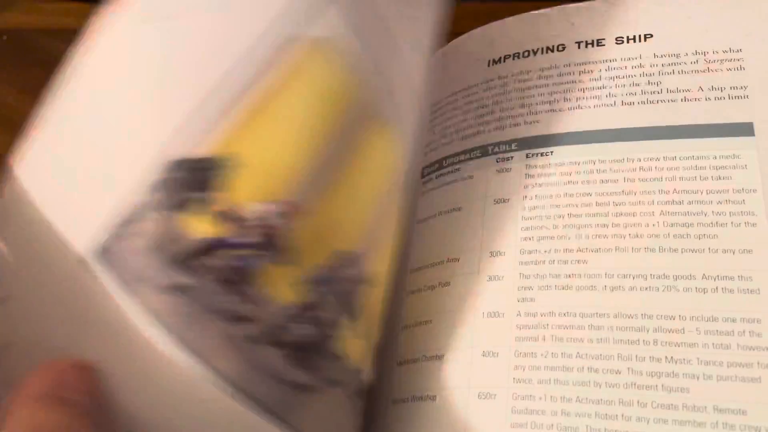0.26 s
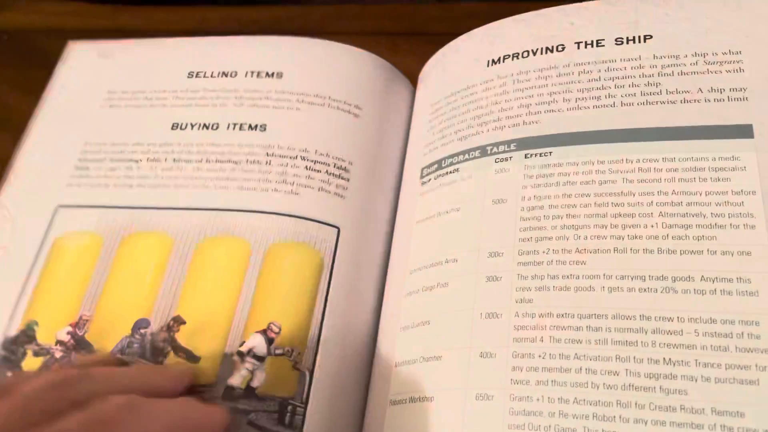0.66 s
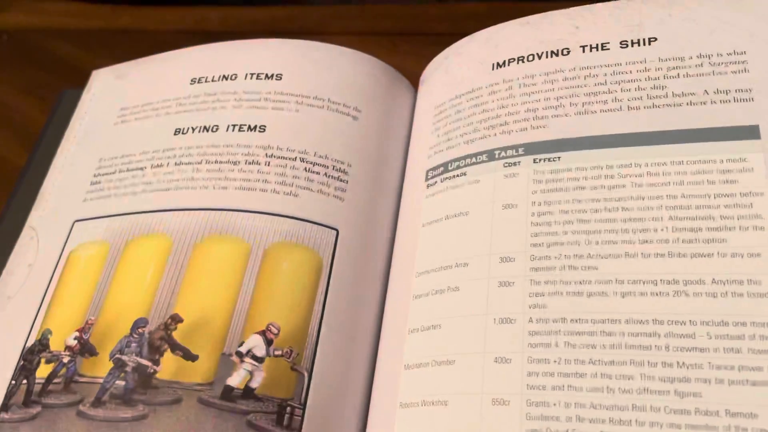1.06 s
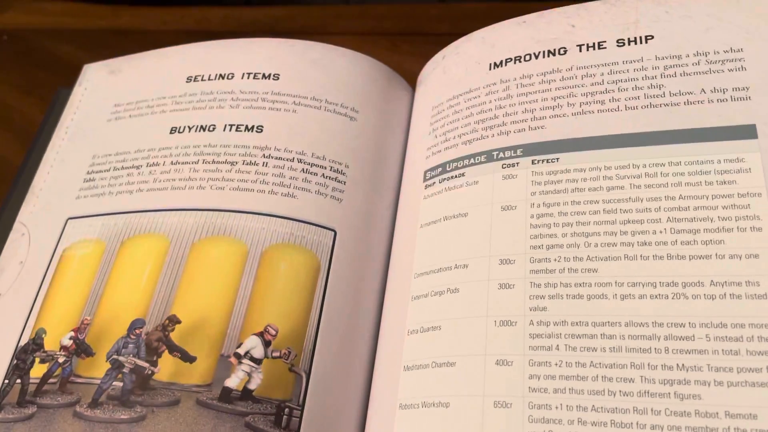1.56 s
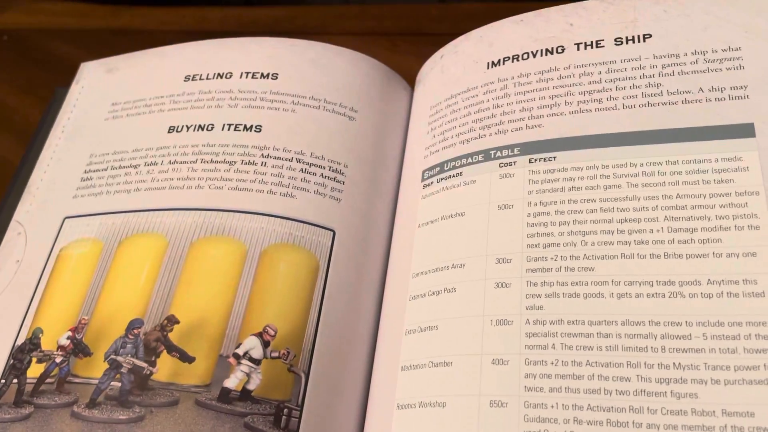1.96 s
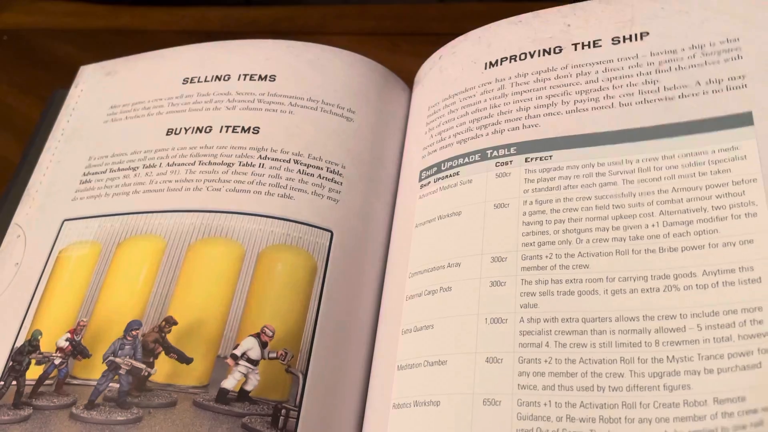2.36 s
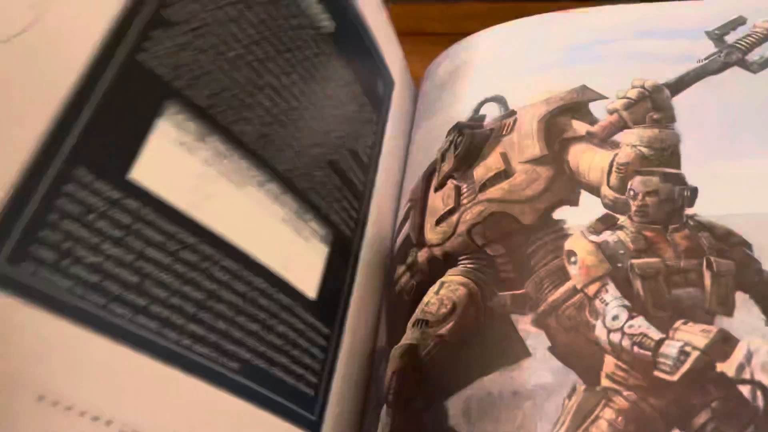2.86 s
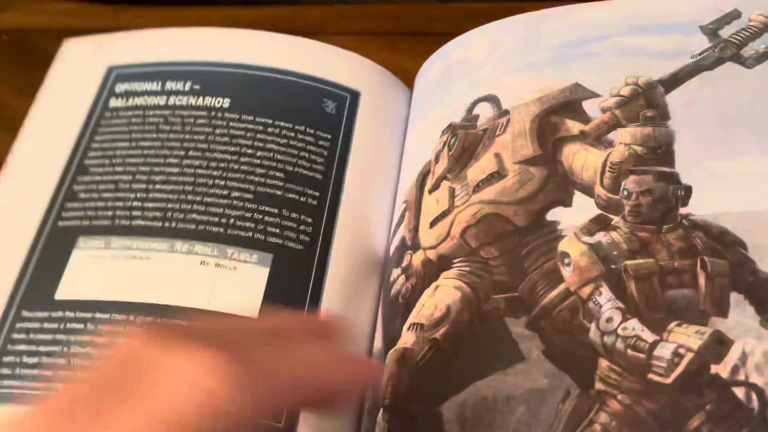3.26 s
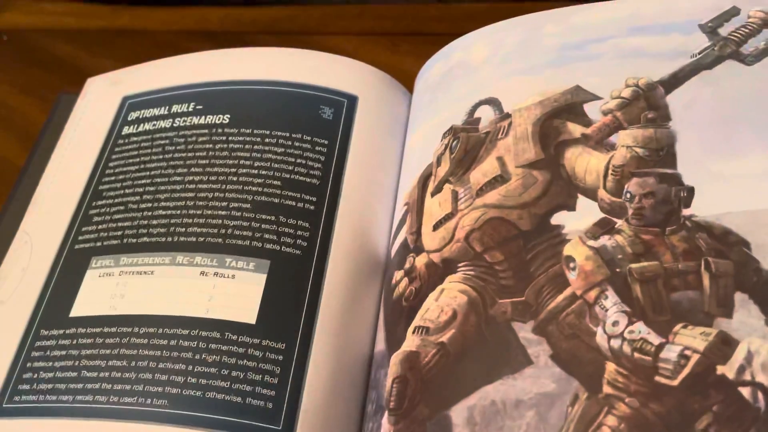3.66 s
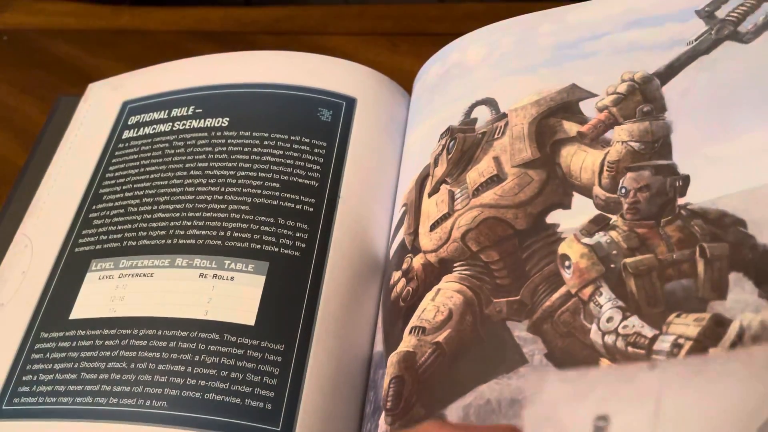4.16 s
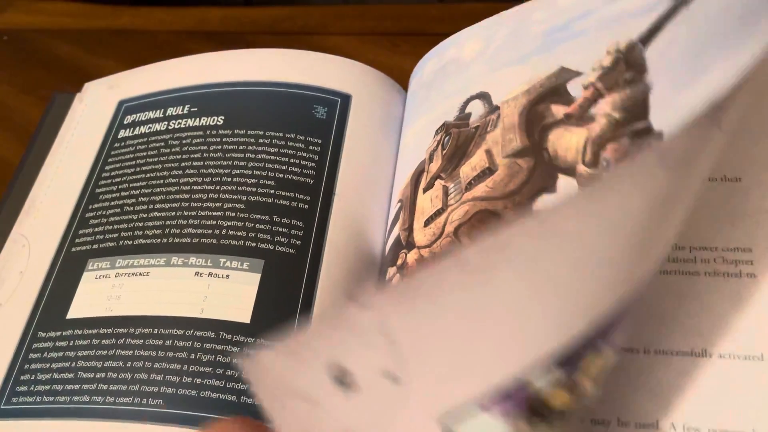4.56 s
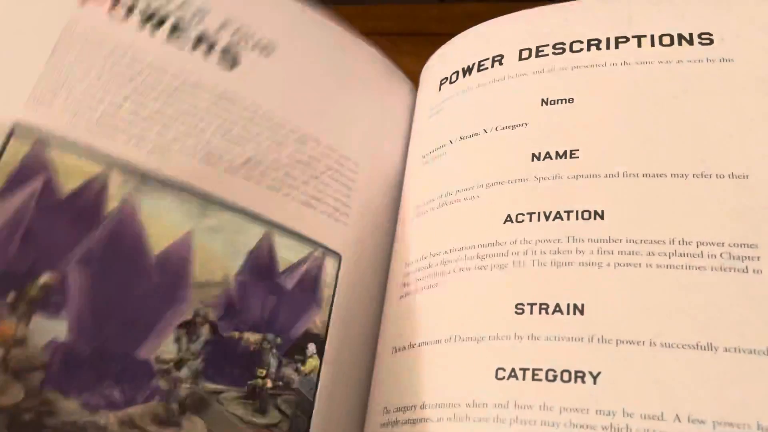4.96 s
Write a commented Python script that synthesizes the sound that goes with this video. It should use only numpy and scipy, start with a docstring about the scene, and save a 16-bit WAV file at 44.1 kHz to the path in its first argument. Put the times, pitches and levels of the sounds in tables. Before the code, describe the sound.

Glossy pages of a thick book are handled on a wooden table, close to a stereo microphone in a quiet, dry room. A soft slide of paper starts at 0 s, with a small click at 0.14 and a dull, swelling flap at about 0.3. A crisp edge snap comes at 0.6, then light crackly rubbing fades, leaving near quiet around 1.0-1.5. From 1.55 to 2.4 page edges tick off the thumb in bright snaps, strongest at 2.0-2.15, with low thuds falling in pitch through the table. Rubbing grows from 2.4 until a sheet flaps over with a thump at 2.87. Only faint rustle remains from 3.1 to 3.75. Clicks resume at 3.8, then sharp slides and snaps gather at 4.1-4.3, the loudest at 4.26. Another lift and turn follows, with swishes, a snap at 4.72 and dull flaps with a thud around 4.85-4.95. Faint low rumble and still air lie beneath.

```python
"""A soft slide of paper on paper comes first, then the glossy pages of a thick book are thumbed, lifted and turned
on a wooden table, close to a two-port microphone. Sliding paper is shaped noise with small crackles, page edges
snap off the thumb as clicks with short rattles, and sheets belly and flap down as swells of duller noise.
Each snap also sends a thud, falling in pitch, through book and table; behind it all lie a short room tail,
the low rumble of a quiet room and still air."""
import sys
import numpy as np
from scipy import signal
from scipy.fft import rfft, irfft, next_fast_len
from scipy.io import wavfile
from scipy.ndimage import uniform_filter1d

SR = 44100
rng = np.random.default_rng(int(sys.argv[2]) if len(sys.argv) > 2 else 0)


def master_out(mix):
    """Clip the mix to full scale and print it as 16-bit PCM to the path in sys.argv[1]."""
    frames = np.transpose(np.atleast_2d(mix))
    ceiling = np.clip(frames, -1, 1)
    pcm = np.round(ceiling * 32767).astype(np.int16)
    wavfile.write(sys.argv[1], SR, pcm)


N = 230466

# Paper or finger sliding on paper: start t/s, length t/s, hiss level/dB at start, hiss level/dB at end,
# belly level/dB over the hiss, fizz level/dB over the hiss
SLIDES = [(0.0, 0.096, -56.5, -60.5, -7, -6.5), (0.106, 0.026, -60.5, -50, 2.5, -6),
          (0.233, 0.17, -68.5, -71.5, -15, 0.5), (0.607, 0.15, -61.5, -60, -32, 4.5),
          (0.807, 0.32, -61.5, -77.5, -1.5, 2.5), (1.216, 0.24, -95, -77, -3, 0.5),
          (1.552, 0.28, -54, -89, -5.5, -9), (1.708, 0.095, -57.5, -63.5, -4.5, -6.5),
          (1.837, 0.16, -62, -84, -3, -10), (1.99, 0.16, -54, -73, 5.5, -25.5),
          (2.144, 0.17, -50.5, -85, -6.5, -24.5), (2.312, 0.068, -65, -60, 0.5, -16),
          (2.396, 0.28, -56.5, -58, -20, -6), (2.574, 0.075, -65, -53.5, -25, -1),
          (2.643, 0.24, -49.5, -52.5, -24, -7.5), (3.405, 0.13, -77, -82.5, -24, -2.5),
          (3.644, 0.22, -81.5, -66.5, -3, 2.5), (3.86, 0.048, -62, -52, -5.5, -20),
          (3.914, 0.14, -61, -59.5, -3, -9.5), (4.067, 0.011, -54, -52, -9.5, -13.5),
          (4.139, 0.033, -39.5, -46.5, -5.5, -15.5), (4.206, 0.0076, -36, -36, -10, -27),
          (4.09, 0.041, -67, -61.5, -0.5, -19), (4.289, 0.084, -41.5, -54, -10, -10),
          (4.379, 0.092, -53, -50, -36, -11), (4.531, 0.25, -55.5, -61, -8.5, -3.5),
          (4.711, 0.1, -44, -46, -6.5, -8.5), (4.821, 0.063, -45.5, -58, 4, -2),
          (4.903, 0.0039, -43.5, -42.5, 4.5, -11)]
# A sheet bellies out and drops: peak t/s, belly level/dB, swell rate/(dB/s), fall rate/(dB/s)
FLAPS = [(0.296, -49.5, 502, 231), (0.325, -36.5, 298, 323), (0.612, -54.5, 3000, 145),
         (0.884, -55.5, 500, 400), (2.86, -49.5, 103, 898), (2.879, -36.5, 2498.5, 357),
         (3.464, -68, 273, 159), (4.464, -47.5, 252, 503), (4.537, -51, 904, 213), (4.845, -43.5, 152, 168),
         (4.937, -43, 245, 600), (5.024, -65, 798, 502)]
# Page edges slipping free: t/s, nominal snap level/dB, body level/dB over the snap, thud peak level/dB
SNAPS = [(0.135, -42.5, 14, -57), (0.6069, -32, -4, -51), (0.636, -68, 7, -49), (1.282, -48.5, 2, -86),
         (1.5618, -22.5, -30, -54), (1.5781, -27, -33, -51), (1.8436, -30.5, -37, -50.5),
         (1.9958, -21, -9.5, -39.5), (2.0303, -19.5, -9.5, -38), (2.1052, -19, -3, -30.5),
         (2.15, -16, -2.5, -33.5), (2.3152, -27, -2, -46), (2.393, -33.5, -4, -49.5),
         (2.6727, -35, -19, -43), (2.8737, -22.5, 7, -28), (2.888, -45, 31.5, -51.5), (2.9, -51, 36.5, -50),
         (2.9054, -33.5, 12, -41.5), (3.8037, -27, -6.5, -62), (3.8686, -23, -27, -50.5),
         (3.8781, -32.5, 3.5, -51.5), (4.1427, -22.5, -2, -69), (4.2127, -21, -1, -55),
         (4.258, -12.5, -5, -51), (4.2854, -17.5, -2.5, -56.5), (4.4392, -41, 1, -49.5),
         (4.456, -56, 10, -66), (4.482, -36.5, -1, -64), (4.535, -49.5, 13.5, -49), (4.562, -43.5, 1, -51),
         (4.7222, -24.5, -4, -47), (4.795, -39, -9, -40), (4.84, -35, 14.5, -37.5),
         (4.908, -37, 16.5, -29.5), (4.93, -43.5, 25.5, -41.5), (4.952, -50.5, 27, -58),
         (5.016, -67.5, 34, -59)]
# Dry creases in the paper: t/s, nominal level/dB
TICKS = [(0.986, -47.5), (1.3408, -56.5), (1.5084, -42), (1.527, -40), (1.886, -47.5), (1.935, -53),
         (1.972, -48), (2.003, -29), (2.3347, -38.5), (2.558, -42.5), (3.1014, -61), (3.6597, -52.5),
         (3.6866, -61), (3.771, -59), (3.8013, -30), (3.832, -38.5), (3.886, -35.5), (4.124, -47),
         (4.4254, -35), (4.8073, -32.5), (4.92, -41)]
# Spectrum of paper rubbing: f/Hz, level/dB
HISS_SPECTRUM = [(350, -29.5), (800, -3), (1500, 5), (2400, 4.5), (3250, 5), (4200, 2.5), (5500, 3),
                 (6800, -1.5), (8500, -23)]
# Spectrum of the high fizz of sliding: f/Hz, level/dB
FIZZ_SPECTRUM = [(4300, -25.5), (5500, 3), (8000, 0.5), (12000, 4), (14500, 5.5), (16300, -38)]
# Spectrum of the duller rush and slap of a sheet: f/Hz, level/dB
BELLY_SPECTRUM = [(200, -5.5), (480, 2), (650, 5), (750, 7), (1050, 1.5), (1600, -5.5), (2500, -43)]
# Spectrum of snapping edges and creases: f/Hz, level/dB
SNAP_SPECTRUM = [(300, -7), (1000, -12), (2000, 0.5), (3500, -2), (6000, -7), (16500, -23.5)]
# Bending wave in the table: cycles per e-fold of time, start t/s, rise t/s, T60 t/s
TABLE_WAVE = (1.737, 0.0037, 0.012, 0.093)
# Resonance of the free part of the sheet, moving as it is bent and held: t/s, f/Hz, strength level/dB
SHEET_RESONANCE = [(.105, 1900, 1), (.14, 1830, 8), (.3, 2760, 6), (0.619, 5150, -8), (.72, 5400, -2),
                   (.98, 3130, 0), (1.57, 4940, 1.5), (1.8, 5650, 6), (2.1, 2920, -12.5), (2.44, 5360, 0.5),
                   (2.532, 5780, 1.5), (2.6, 4550, -3.5), (2.74, 3340, -6), (3.949, 2800, -6),
                   (4.221, 1970, -12.5), (4.601, 5780, -12.5), (4.76, 5830, -4.5), (4.918, 1700, -2.5)]
# Decay of the room: f/Hz, T60 t/s
ROOM_T60 = [(300, 0.2), (12000, 0.096)]
# Weight shifting on the table: t/s, rumble level/dB
RUMBLE_LEVEL = [(0, -61.5), (1.298, -66), (2.701, -60.5), (3.1, -64), (4.1, -63.5), (4.3, -46.5),
                (4.6, -64), (4.849, -49), (5.051, -64)]
# Spectrum of the rumble: f/Hz, level/dB
RUMBLE_SPECTRUM = [(25, -13), (62, 6.5), (100, -8), (160, -12.5), (300, -21), (500, -64.5)]
# Spectrum of the still air: f/Hz, level/dB
AIR_SPECTRUM = [(200, 11.5), (700, 1.5), (1500, -6.5), (5000, -14.5), (16000, -30.5)]
# Likeness of the left and right channels: f/Hz, likeness/1
CHANNEL_LIKENESS = [(60, .95), (1400, .8), (5000, .84), (7600, .98)]
# Level difference of the channels: f/Hz, left over right level/dB
CHANNEL_TILT = [(60, 1.2), (500, 4.2), (4000, 3.6), (7600, 0)]
# Phase by which the left channel leads, before the opposite-phase bands: f/Hz, lead/rad
CHANNEL_LEAD = [(60, .55), (300, 1.1), (600, .5), (2500, 1.0), (5000, .6), (7400, 0), (14000, .25)]
# Edges of the treble bands where left and right are in opposite phase: f/Hz
OPPOSITE_PHASE_EDGES = [7490, 9135, 13240]

GRIP_DB_PER_S, LIFT_DB_PER_S = 4496, 1504  # how fast a slide sets in and lets go
REST_DB = -94  # constant faint floor under the slides and flaps
FLAP_HISS_DB, FLAP_FIZZ_DB = -17, -53.5  # over the belly
CRACKLE_PER_S, CRACKLE_DB = 350, -12.5  # small creases under a slide, level over the hiss
CRACKLE_SPREAD_DB, TICK_T60_S = 4, 0.01
ROOM_DB, AIR_DB = -11.0, -76.5
BASS_CUT_HZ, EDGE_HZ = 42, 16600


def strokes():
    """Sliding paper hisses and fizzes; the bellying sheet adds a duller, lumpier rush."""
    hiss_level, fizz_level, belly_level = stroke_levels()
    contact = flutter(width=60, depth_db=1.5)
    hiss = evened(colour(pair(patchy_db=2.0), HISS_SPECTRUM))
    fizz = evened(colour(pair(patchy_db=1.5), FIZZ_SPECTRUM))
    lumpy = pair(patchy_db=3.0) * flutter(width=25, depth_db=3.5)
    rush = evened(colour(lumpy, BELLY_SPECTRUM)) * flutter(width=150, depth_db=0.5)
    sliding = contact * (hiss_level * hiss + fizz_level * fizz)
    return sliding + belly_level * rush + crackle(hiss_level)


def stroke_levels():
    """Slides and flaps add in power, giving the moving levels of hiss, fizz and belly."""
    power = np.full((3, N), gain_of(REST_DB) ** 2)
    for start, length, start_db, end_db, belly_db, fizz_db in SLIDES:
        slide = tent(start, start + length, start_db, end_db, GRIP_DB_PER_S, LIFT_DB_PER_S)
        power += (gain_of([[0], [fizz_db], [belly_db]]) * slide) ** 2
    for peak, db, swell, fall in FLAPS:
        flap = tent(peak, peak, db, db, swell, fall)
        power += (gain_of([[FLAP_HISS_DB], [FLAP_FIZZ_DB], [0]]) * flap) ** 2
    return np.sqrt(power)


def crackle(hiss_level):
    """Creases pop: a few large ones stand alone, a random swarm of small ones rides on every slide."""
    size = gain_of(CRACKLE_SPREAD_DB * np.minimum(rng.exponential(1, N), 4))
    pops_now = rng.random(N) < CRACKLE_PER_S / SR
    swarm = evened(size * pops_now) * gain_of(CRACKLE_DB) * hiss_level
    swarm = swarm * rng.choice([-1., 1.], N)
    ticks = np.zeros(N)
    for s, db in TICKS:
        ticks[round(s * SR)] = gain_of(db)
    decay = gain_of(-60 * np.arange(SR // 20) / SR / TICK_T60_S)
    burst = signal.oaconvolve(ticks, decay)[:N] * pair(patchy_db=0)
    return colour(burst + swarm, SNAP_SPECTRUM)


def snaps():
    """Each slip is a tick, a short uneven rattle of the edge, and a knock into the table."""
    bright, dull, knock, tick, slap = np.zeros((5, N + SR))
    t = np.arange(SR // 4) / SR
    rattle = 0.35 * (1 - np.exp(-t / 0.00093)) * gain_of(-60 * t / 0.024)
    slow_rattle = uniform_filter1d(rattle, size=100)  # the body moves slower
    for s, db, body_db, thud_db in SNAPS:
        at = round(s * SR)
        snap_gain, body_gain = gain_of(db), gain_of(db + body_db)
        bright[at:at + len(t)] += snap_gain * rattle
        dull[at:at + len(t)] += body_gain * slow_rattle
        tick[at + 50] += 1.17 * snap_gain  # the edge lets go at once
        slap[at + 50] -= 1.83 * body_gain
        knock[at + 40] += gain_of(thud_db)
    grain = pair(patchy_db=0) * flutter(width=40, depth_db=1.5)
    edge = colour(bright[:N] * grain + tick[:N], SNAP_SPECTRUM)
    body = colour(dull[:N] * pair(patchy_db=2) + slap[:N], BELLY_SPECTRUM)
    return edge + body + signal.oaconvolve(knock, thud())[:N]


def thud():
    """A bending wave through the table, of peak 1: the high part arrives first, so the thud falls in pitch."""
    cycles, start, rise, t60 = TABLE_WAVE
    t = np.arange(SR // 4) / SR
    envelope = (1 - np.exp(-t / rise)) * gain_of(-60 * t / t60)
    wave = envelope * np.sin(2 * np.pi * cycles * np.log(1 + t / start))
    return wave / abs(wave).max()


def sheet(x, width_hz):
    """The free part of the sheet rings: its moving resonance is shifted to zero, smoothed twice, shifted back."""
    s, hz, db = np.transpose(SHEET_RESONANCE)
    t = np.arange(N) / SR
    turn = np.exp(2j * np.pi * np.cumsum(np.interp(t, s, hz)) / SR)
    r = np.exp(-np.pi * width_hz / SR)
    smooth = signal.lfilter([(1 - r) ** 2], [1, -2 * r, r ** 2], x / turn + 1e-18)
    ring = 2 * (turn * smooth).real
    return gain_of(np.interp(t, s, db)) * ring


def room(x):
    """Sparse taps of random sign, each band dying at its own speed, its left-right likeness set by frequency."""
    taps = np.zeros((2, SR // 2))
    slots = np.arange(200, SR // 2 - 20, 20)  # one tap in every 20 samples
    at = slots + rng.integers(0, 20, (2, len(slots)))
    np.put_along_axis(taps, at, rng.choice([-1., 1.], at.shape), 1)
    hz, t, z = signal.stft(taps, SR, nperseg=256)
    same = np.clip(read(CHANNEL_LIKENESS, hz), 0, 1)[:, None] ** 4
    z[1] = same * z[0] + np.sqrt(1 - same ** 2) * z[1]
    decay = gain_of(-60 * t / read(ROOM_T60, hz)[:, None])
    tail = signal.istft(z * decay, SR, nperseg=256)[1]
    tail = tail / np.linalg.norm(tail[0])
    return signal.fftconvolve(x.mean(0)[None], tail, axes=1)[:, :N]


def rumble():
    """Lumpy low vibration of table and building, as shaped noise."""
    s, db = np.transpose(RUMBLE_LEVEL)
    low = evened(colour(pair(patchy_db=1.0), RUMBLE_SPECTRUM)) * flutter(width=1500, depth_db=1.0)
    return low * gain_of(np.interp(np.arange(N) / SR, s, db))


def still_air():
    """Steady, patchy noise with a falling spectrum."""
    return gain_of(AIR_DB) * evened(colour(pair(patchy_db=4.5), AIR_SPECTRUM))


def gain_of(db):
    """Decibels to gain."""
    return 10 ** (np.asarray(db) / 20)


def evened(x):
    """Scaled to rms 1."""
    return x / np.sqrt(np.mean(x ** 2) + 1e-20)


def read(points, hz):
    """A table over frequency, read on a log-frequency axis."""
    f, value = np.transpose(points)
    return np.interp(np.log(hz + 1), np.log(f + 1), value)


def colour(x, points):
    """Causal minimum-phase filter with the given spectrum shape, so that attacks stay sharp."""
    hz = abs(np.fft.fftfreq(8192, 1 / SR))
    log_gain = np.log(gain_of(read(points, hz)))
    taps = np.fft.ifft(np.exp(np.conj(signal.hilbert(log_gain)))).real[:4096]
    return signal.oaconvolve(x, taps[None] / np.linalg.norm(taps), axes=1)[:, :N]


def pair(patchy_db):
    """White noise in two channels, their likeness set by frequency, with drifting patches."""
    frames, hz = N // 128 + 5, np.fft.rfftfreq(512, 1 / SR)
    a, b, c, d, patches = rng.standard_normal((frames, 257, 5)).T
    patches = uniform_filter1d(patches, size=6, axis=0)  # along frequency
    patches = evened(uniform_filter1d(patches, size=14, axis=1))  # along time
    same = np.clip(read(CHANNEL_LIKENESS, hz), 0, 1)[:, None]
    left = a + 1j * b
    right = same * left + np.sqrt(1 - same ** 2) * (c + 1j * d)
    z = np.array([left, right]) * gain_of(patchy_db * patches)
    return evened(signal.istft(z, nperseg=512, noverlap=384)[1][:, :N])


def flutter(width, depth_db):
    """Random unevenness of level, changing within the given number of samples."""
    wobble = uniform_filter1d(uniform_filter1d(rng.standard_normal(N), width), width)
    return evened(gain_of(depth_db * evened(wobble)))


def tent(start, end, start_db, end_db, rise, fall):
    """A level that climbs at one rate, glides from start to end, and drops at another (rates in dB/s)."""
    t = np.arange(N) / SR
    glide_db = np.interp(t, [start, end + 1e-4], [start_db, end_db])
    return gain_of(glide_db - rise * np.maximum(start - t, 0) - fall * np.maximum(t - end, 0))


def scene():
    """Book sounds, their room tail, rumble and still air."""
    paper = strokes() + snaps()
    book = paper + sheet(paper, width_hz=1120)
    return book + gain_of(ROOM_DB) * room(book) + rumble() + still_air()


def record(dry):
    """The two channels differ in level and phase, with opposite phase in some treble bands;
    deep bass and top treble are cut."""
    size = next_fast_len(N + 4096)
    hz = np.fft.rfftfreq(size, 1 / SR)
    half_turns = sum(np.pi / (1 + np.exp((edge - hz) / 100)) for edge in OPPOSITE_PHASE_EDGES)
    lead = read(CHANNEL_LEAD, hz) - half_turns
    left = gain_of(read(CHANNEL_TILT, hz) / 2) * np.exp(.5j * lead)  # half the difference goes to each side
    bass_cut = 1 / np.sqrt(1 + (BASS_CUT_HZ / (hz + 1)) ** 8)
    stereo = irfft(rfft(dry, size) * bass_cut * np.array([left, 1 / left]), size)[:, :N]
    band_limit = signal.firwin(511, EDGE_HZ, window=("kaiser", 9), fs=SR)
    return signal.oaconvolve(stereo, band_limit[None], "same")


dry = scene()
out = record(dry)
master_out(out)
```